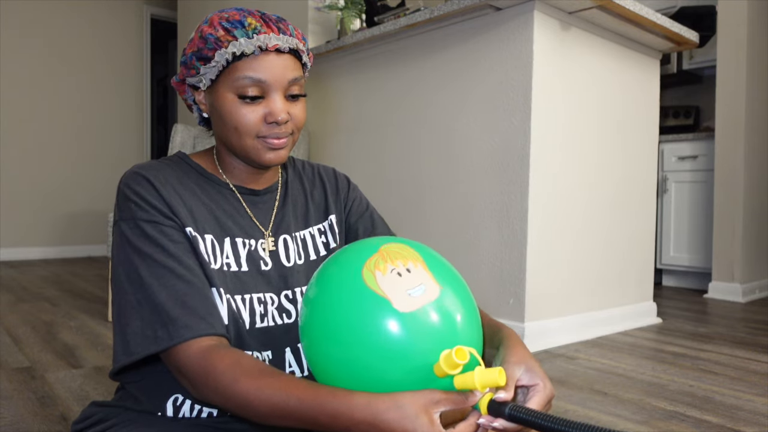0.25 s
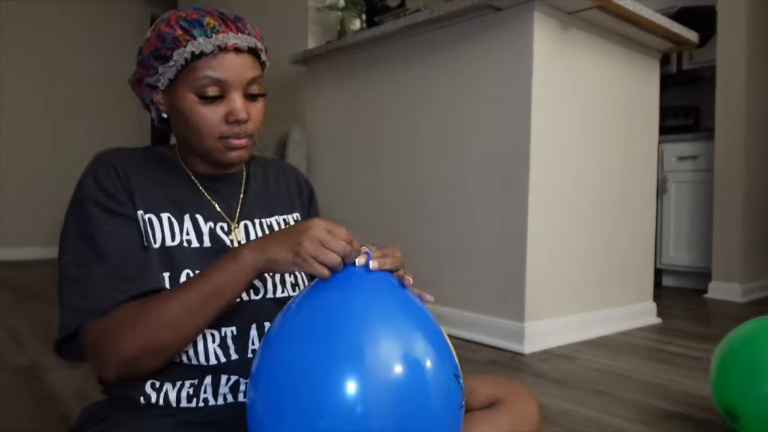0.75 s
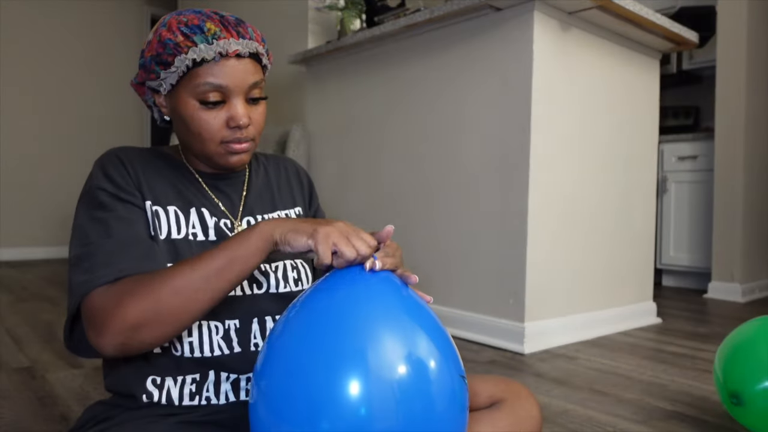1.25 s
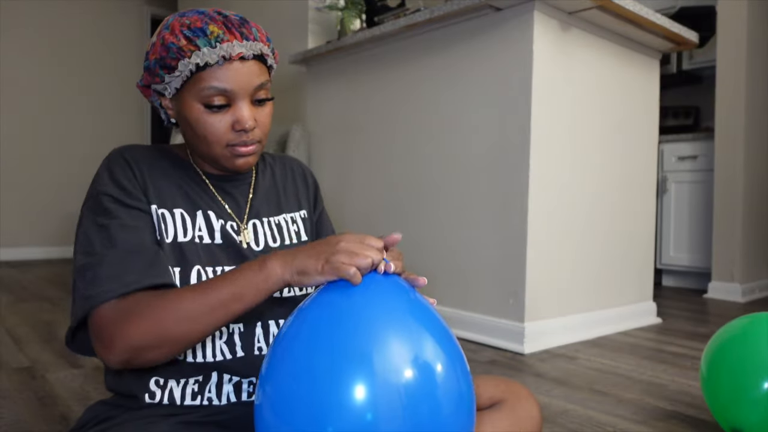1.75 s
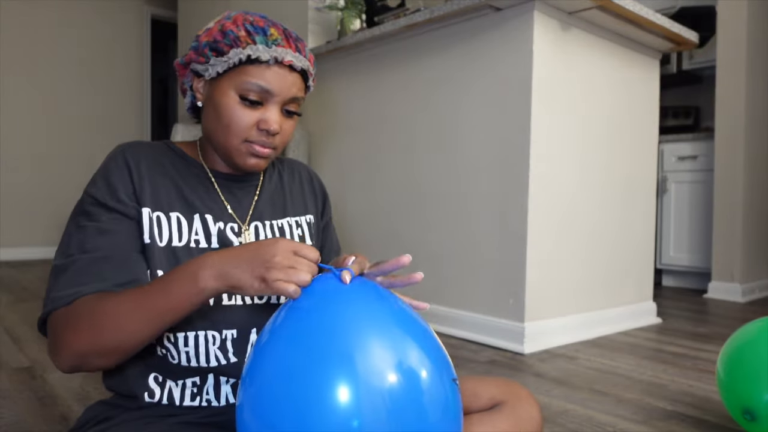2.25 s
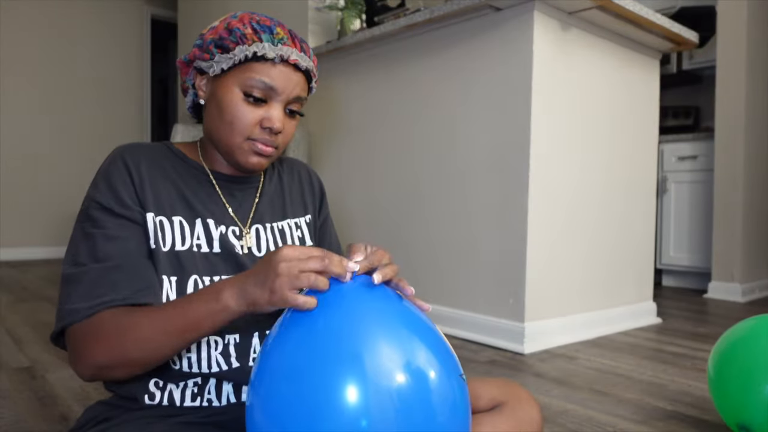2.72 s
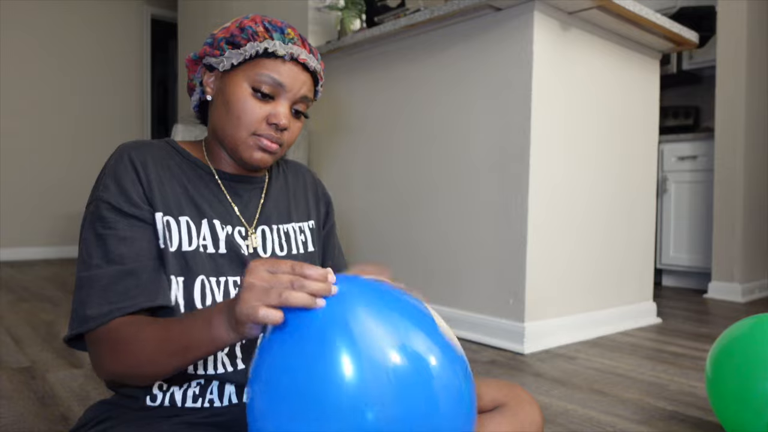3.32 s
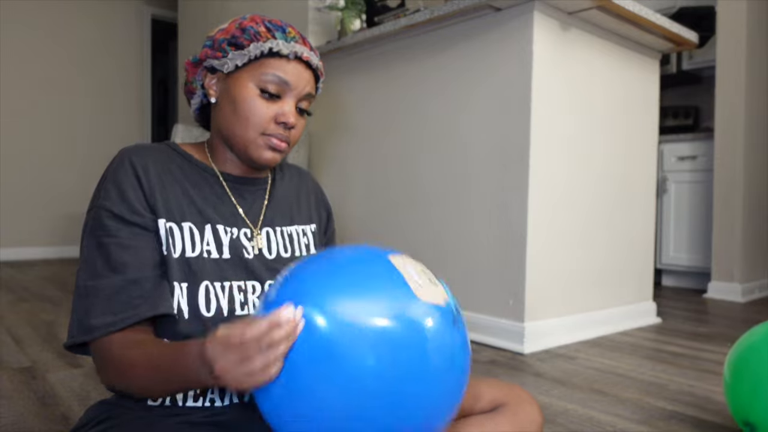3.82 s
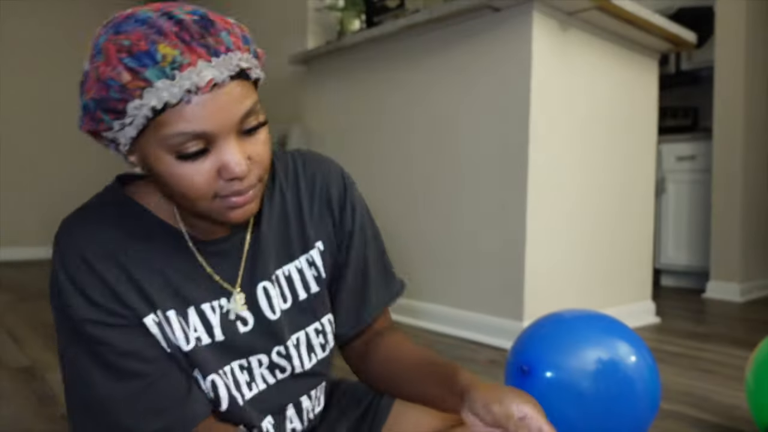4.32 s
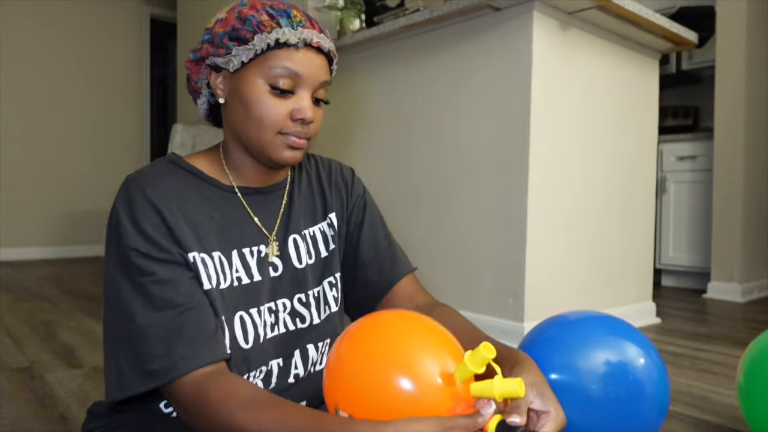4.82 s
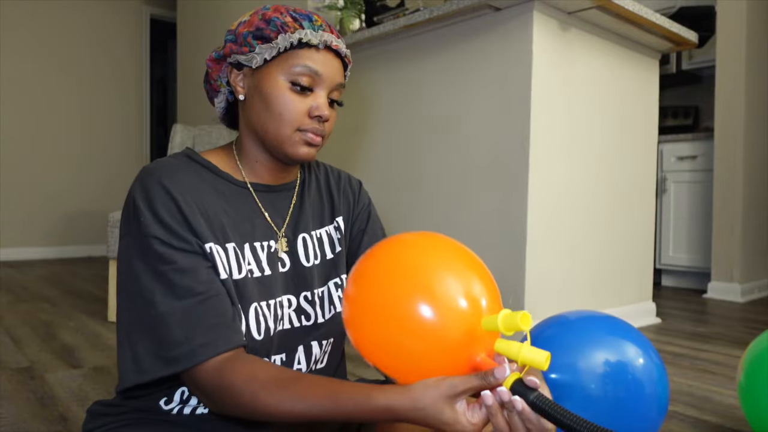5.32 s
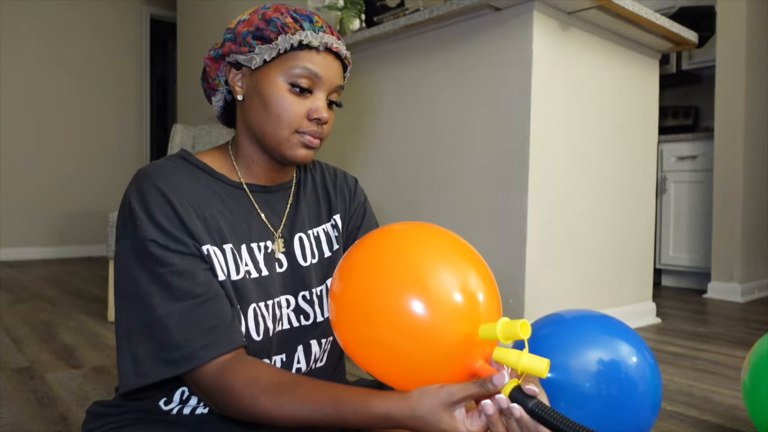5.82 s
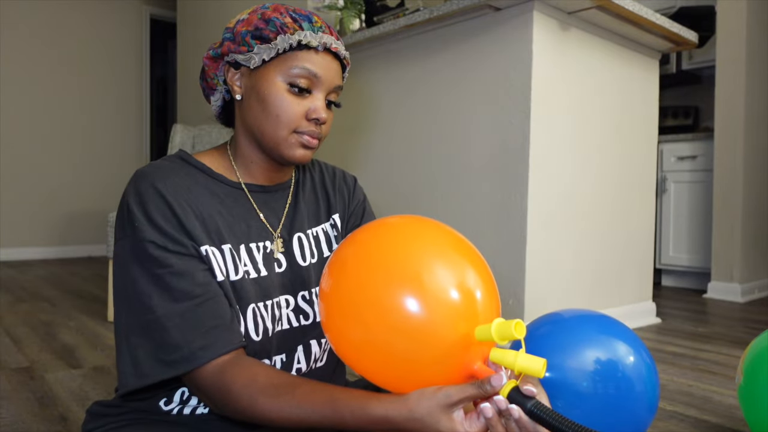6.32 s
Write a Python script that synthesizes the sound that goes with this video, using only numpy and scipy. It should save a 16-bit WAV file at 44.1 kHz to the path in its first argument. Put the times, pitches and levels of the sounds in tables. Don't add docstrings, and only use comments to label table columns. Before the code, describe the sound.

Close air pump blast stops abruptly; in a quiet room a balloon neck is stretched and knotted with small squeaks, then a brighter pump blast resumes.

```python
import sys
import numpy as np
from scipy import signal
from scipy.fft import rfft, irfft, next_fast_len
from scipy.io import wavfile
from scipy.ndimage import uniform_filter1d, minimum_filter1d

SR = 44100
rng = np.random.default_rng(int(sys.argv[2]) if len(sys.argv) > 2 else 0)


def elevation(decibels):
    levels = np.asarray(decibels, float)
    return 10 ** (levels / 20)


def master_out(mix):
    frames = np.transpose(np.atleast_2d(mix))
    ceiling = np.clip(frames, -1, 1)
    pcm = np.round(ceiling * 32767).astype(np.int16)
    wavfile.write(sys.argv[1], SR, pcm)


N = 289296
TIME, SIZE = np.arange(N) / SR, next_fast_len(N, True)
BINS = np.maximum(np.fft.rfftfreq(SIZE, 1 / SR), 1)

# time in seconds, air rush in dB, shaft tone in dB.
SLOW_RUN = [
    (0, -14.5, -21),
    (.2, -14.5, -21.5),
    (.42, -13.5, -21),
]
FAST_RUN = [
    (4.31, -15, -23.5),
    (4.53, -14.5, -26.5),
    (4.88, -15.5, -23.5),
    (6.52, -14.5, -22.5),
    (6.56, -13, -22),
]
# time in seconds, level in dB.
BLADE_TONE = [
    (4.3, -38),
    (4.7, -35),
    (4.85, -31),
    (5.7, -30),
    (6.1, -32),
    (6.25, -34),
    (6.45, -30),
]
# multiple of the shaft rate, level beside the shaft tone in dB.
OVERTONES = [(2, -20), (3, -20.5), (4, -26.5), (6, -20)]
# frequency in Hz, level in dB.
MOTOR_HUM = [(128, -85.5), (243, -84)]
# frequency in Hz, level in dB per Hz.
SLOW_AIR = [(60, -67), (133, -52), (340, -28), (600, -20), (800, -19), (1600, -14.5), (1950, -10),
            (2650, -13), (4200, -15.5), (8000, -16.5), (11500, -18.5), (16000, -23)]
FAST_AIR = [(30, -53.5), (100, -58), (193, -61.5), (715, -27), (1050, -23), (1300, -17.5), (1620, -17),
            (2520, -13), (3850, -6), (7940, -12.5), (8920, -11.5), (10300, -14), (13500, -10),
            (16000, -11.5)]
# frequency in Hz, width in Hz, boost in dB.
SLOW_PIPES = [(1280, 170, 4.5), (1920, 280, 2.5), (2690, 190, 4), (3470, 79, 5.5), (4762, 310, 3.5),
              (6700, 770, 4), (9140, 140, 5), (11300, 200, 2), (11600, 430, -5), (12700, 900, 4.5),
              (13900, 600, -6), (14700, 300, 3.5)]
FAST_PIPES = [(750, 156, 3.3), (2550, 200, 4), (3985, 110, 1.5), (5580, 300, 2.3), (6780, 340, 2.6),
              (9170, 290, 4), (13400, 610, 1.4)]
# frequency in Hz, left minus right in dB.
SLOW_PAN = [(350, 0), (450, -1.6), (900, -1.2), (1300, -3), (3400, -2.3), (3900, -3.1), (8200, -3),
            (8900, 0), (10800, .5), (11700, 3.2), (14500, 3.2), (15500, 2.5)]
FAST_PAN = [(950, 0), (1100, -1.7), (1800, -1.9), (2300, -3), (3200, -4), (6300, -3.4), (8000, -2.4),
            (8750, -2.2), (8950, -4.4), (10500, -3), (13500, -1.9), (15500, -2.5)]
# frequency in Hz, level in dB per Hz.
FLOOR = [(18, -64.5), (30, -51.5), (189, -17.5), (239, -7), (364, -9), (1010, -4), (1670, -5.5), (5170, -8),
         (5740, -5.5), (12000, -15.5), (16000, -17.5)]
# time in seconds, peak in dB, brightness in dB.
TICKS = [(0.6854, -34, -17), (0.7014, -34, -15), (0.7565, -32, -11), (0.7899, -36, -14), (0.8213, -38, -4),
         (0.9226, -37, -12), (1.0254, -27, -12), (1.1522, -33, -13), (1.2523, -39, -13), (1.463, -37, -9.5),
         (1.5123, -41, -9), (2.0021, -45, -5), (2.0595, -45, -5), (2.086, -41, -6), (2.1425, -42, -7),
         (2.1772, -41, -10), (2.276, -47, -16), (2.5045, -38, -17), (2.716, -44, -14), (2.9, -38, -14),
         (3.1855, -38, -14), (3.2603, -31, -15), (3.4299, -45, -17), (3.4603, -36, -16), (3.6289, -38, -15),
         (3.6894, -33, -6), (3.717, -26, -13), (3.7404, -32, -7), (3.9163, -38.5, -8), (4.2396, -49, -9)]
# time in seconds, peak in
# dB.
MORE_TICKS = [(0.4888, -51), (0.692, -36), (0.7074, -32), (0.799, -35), (0.8134, -38), (1.045, -35),
              (1.4324, -54), (1.646, -38), (1.825, -36), (1.9577, -44), (2.0196, -52), (2.0994, -47),
              (2.113, -52), (2.2062, -52), (2.2226, -47), (2.3429, -51), (2.4401, -47), (2.5174, -46),
              (2.5349, -41), (2.722, -39), (3.0138, -42), (3.036, -41), (3.3965, -50)]
# frequency in Hz, width in Hz, level in dB.
BODY = [(760, 93, -5), (925, 150, -3), (1200, 260, -5), (1560, 400, -2.5)]
SKIN = [(2130, 1300, -6.5), (2750, 500, 1.5), (3236, 1300, -1.5), (3825, 690, 1.5), (4600, 330, -1.5)]
TIPS = [(4950, 180, -5), (5750, 680, 3), (6700, 600, 2), (7540, 680, 1.5)]
RUSTLE = [(8600, 490, 1.5), (9400, 800, -1.5), (10800, 1500, -3.5), (13000, 3000, -10)]
# start in seconds, length in seconds, first frequency in Hz, last frequency in Hz, level in dB.
SQUEAKS = [(.51, 0.11, 3590, 3600, -75), (0.801, 0.034, 1030, 1000, -69), (0.928, 0.1, 1060, 1100, -68),
           (0.918, 0.26, 3530, 3620, -58.5), (0.858, 0.14, 2960, 2720, -67), (1.031, .05, 980, 990, -61),
           (1.249, 0.069, 1000, 930, -60.5), (1.396, 0.3, 3700, 3400, -73), (1.5, 0.33, 2590, 2330, -70),
           (1.85, 0.15, 6300, 6600, -67), (2.275, .03, 1300, 1280, -71), (2.318, 0.1, 5930, 5900, -87),
           (2.275, 0.031, 2550, 2550, -63), (2.49, 0.065, 2500, 2500, -69), (2.698, 0.062, 2550, 2580, -67),
           (2.842, 0.12, 710, 760, -73.5), (3.014, 0.12, 2560, 2550, -61), (3.11, 0.087, 943, 700, -73),
           (3.18, 0.1, 1000, 1250, -73), (3.255, .06, 970, 960, -62), (3.254, 0.018, 3630, 3700, -51),
           (3.51, 0.11, 1700, 1700, -69), (3.596, 0.24, 4780, 4800, -65)]
# start in seconds, hold in seconds, level in dB, brightness in dB.
RUBS = [(.53, 0.044, -72, 8), (.585, 0.017, -48.5, -7), (.82, .01, -60.5, -4), (.924, .075, -56.5, 3),
        (1.04, 0.022, -53.5, 3), (1.25, 0.02, -59.5, -1), (1.335, .025, -70, 0), (2.279, 0.015, -64.5, -2),
        (2.33, 0.047, -69, 5), (2.498, .025, -67, -7), (2.712, 0.03, -62.5, -1), (2.885, 0.017, -64, 3),
        (3.262, 0.013, -54, 0), (3.345, .01, -74, 10), (3.398, .01, -70, 5), (3.432, 0.062, -61.5, -1),
        (3.615, 0.13, -54.5, 1)]
DRAGS = [(.62, 0.018, -61, -4), (.85, 0.039, -61.5, 1), (1.1, 0.066, -60.5, 0.5), (1.2, .04, -71, -2),
         (1.56, 0.091, -60.5, -1), (1.75, 0.047, -63.5, -2), (1.87, 0.096, -74.5, 6.5), (2.0, 0.15, -83, 6),
         (2.85, .02, -66.5, 1.5), (3.04, .04, -63.5, 0.5), (2.97, .03, -78, 10), (3.125, .015, -61.5, 5),
         (2.44, .05, -75, 2), (2.17, .03, -75, 0.5), (3.18, 0.077, -59.5, -2.5), (3.55, .015, -60, 2),
         (3.8, .07, -74.5, 15.5), (3.93, 0.012, -65, 10.5), (4.15, 0.035, -75, 12.5),
         (4.25, .04, -64.5, 2.5)]
# level beside the skin in dB, share of the brightness as a ratio.
SHARES = [(-10, -.6), (-0.5, 0), (-1, .8), (-6, 1.3)]
# frequency in Hz, level in dB.
SNAP = [(1100, -18), (3600, 0), (5200, -9), (6300, -8), (9200, -11)]
# frequency in Hz, level in dB per Hz.
SNAP_ROOM = [(180, -78), (300, -48), (762, -17), (1390, -5), (1510, -11), (2360, 0.5), (4830, 2),
             (9550, -10), (16000, -39)]

SLOW_SHAFT_HZ, FAST_SHAFT_HZ, BLADES = 620.0, 1253.7, 7
STOP_S, START_S, FADE_S = .433, 4.2905, .011
FLOOR_DB, HUM_HZ, HUM_DB = -76.5, 239.9, -97
MORE_TICKS_BRIGHT_DB = -11
RUB_RISE_DB_PER_S, RUB_FALL_DB_PER_S = 1800, 330
DRAG_RISE_DB_PER_S, DRAG_FALL_DB_PER_S = 150, 130
SNAP_S, SNAP_LENGTH_S, SNAP_DB = .5797, .004, -24
SNAP_ROOM_DB, ROOM_T60_S = -42, 0.43
PEAK_LIMIT, CUTOFF_HZ, CUT_WIDTH_HZ = .74, 15750, 120


def rms_one(x):
    return x / np.sqrt(np.mean(x ** 2) + 1e-20)


def in_time(rows):
    s, *columns = np.transpose(rows)
    return [np.interp(TIME, s, c) for c in columns]


def shape(points):
    hz, value = np.transpose(points)
    return np.interp(np.log(BINS), np.log(hz), value)


def drift(rate):
    steps = rng.standard_normal(int(N / SR * 200) + 2)
    return rms_one(np.interp(TIME * np.clip(rate, .1, 199), np.arange(len(steps)), steps))


def filtered(x, response):
    return irfft(rfft(x, SIZE) * response, SIZE)[..., :N]


def coloured(response):
    return rms_one(filtered(rng.standard_normal(N), response))


def panned(x, pan, unlike_db):
    half = elevation(shape(pan) / 2)
    unlike = elevation(unlike_db) * np.roll(x, N // 50)
    return filtered(x, np.array([half, 1 / half])) + unlike * [[1], [-1]]


def reflections(t60, wet_db):
    echoes = rng.standard_normal(N) * elevation(-60 * TIME / t60) * (TIME > .006)
    return 1 + elevation(wet_db) * rfft(echoes / np.sqrt(np.sum(echoes ** 2)), SIZE)


def air_rush(spectrum, pipes, flutter_db, t60):
    level_db = shape(spectrum)
    for hz, width, boost_db in pipes:
        level_db = level_db + boost_db / (1 + (2 * (BINS - hz) / width) ** 2)
    rush = coloured(elevation(level_db) * reflections(t60, wet_db=-13))
    return rush * elevation(flutter_db * drift(25))


def whine(shaft_hz, tone_db, blade_db):
    turns = 2 * np.pi * np.cumsum(shaft_hz + .3 * drift(20)) / SR
    shaft = np.sin(turns) + sum(elevation(db) * np.sin(k * turns) for k, db in OVERTONES)
    blades = elevation(blade_db + 1.6 * drift(30)) * np.sin(BLADES * turns)
    return np.sqrt(2) * (elevation(tone_db + 0.12 * drift(6.2)) * shaft + blades)


def slow_pump():
    air_db, tone_db = in_time(SLOW_RUN)
    pump = elevation(air_db) * air_rush(SLOW_AIR, SLOW_PIPES, flutter_db=0.6, t60=.25)
    pump += whine(SLOW_SHAFT_HZ, tone_db, blade_db=-49)
    fade = np.clip((STOP_S - TIME) / FADE_S, 0, 1)
    remnant = elevation(-23) * np.clip((STOP_S + FADE_S - TIME) / FADE_S, 0, 1)
    return panned(pump, SLOW_PAN, unlike_db=-26.5) * np.maximum(fade, remnant)


def room_floor():
    hum = np.sqrt(2) * elevation(HUM_DB) * np.sin(2 * np.pi * HUM_HZ * TIME)
    return elevation(FLOOR_DB) * coloured(elevation(shape(FLOOR))) + hum


def resonate(x, modes):
    out = np.zeros(N)
    for k, (hz, width, level_db) in enumerate(modes):
        r = np.exp(-np.pi * width / SR)
        b = (1 - r * r) / 2 * np.array([1, 0, -1])
        a = [1, -2 * r * np.cos(2 * np.pi * hz / SR), r * r]
        out += (-1) ** k * elevation(level_db) * signal.lfilter(b, a, x + 1e-18)
    return out


def ticks(length_s):
    slips = TICKS + [(s, db, MORE_TICKS_BRIGHT_DB) for s, db in MORE_TICKS]
    s, peak_db, bright_db = np.transpose(slips)
    burst = rng.standard_normal((len(s), 200)) * np.exp(-np.arange(200) / SR / length_s)
    burst /= np.sqrt(np.sum(burst ** 2, axis=1, keepdims=True))
    low, high = np.zeros(N), np.zeros(N)
    for at, db, bright, b in zip((s * SR).astype(int), peak_db, bright_db, burst):
        low[at:at + 200] = elevation(db) * b
        high[at:at + 200] = elevation(db + bright) * b
    bright = elevation(20) * (resonate(high, TIPS) + elevation(-5) * resonate(high, RUSTLE))
    return elevation(12) * resonate(low, SKIN) + elevation(9.5) * resonate(low, BODY) + bright


def friction(slips_per_s, smooth):
    sizes = elevation(2.8 * np.minimum(rng.exponential(1, N), 4)) * rng.choice([-1, 1], N)
    slips = sizes * (rng.random(N) < slips_per_s * elevation(5.0 * drift(90)) / SR)
    return rms_one(rms_one(slips) + smooth * rng.standard_normal(N))


def squeaks(source, breadth):
    out = np.zeros(N)
    for s, length, first_hz, last_hz, db in SQUEAKS:
        at, size = int(s * SR), int(length * SR)
        turn = np.exp(2j * np.pi * np.cumsum(np.linspace(first_hz, last_hz, size)) / SR)
        r = np.exp(-np.pi * breadth * first_hz / SR)
        centred = signal.lfilter([1], [1, -2 * r, r * r], source[at:at + size] / turn)
        band = np.real(centred * turn)
        swell = np.sin(np.pi * np.sqrt(np.arange(size) / size))
        out[at:at + size] += elevation(db) * swell * rms_one(band)
    return out


def strokes(rows, rise, fall, offset_db, share):
    s, hold, db, bright = np.transpose(rows)[..., None]
    t = TIME[::44]
    level_db = db + offset_db + share * bright
    level_db = level_db - rise * np.maximum(s - t, 0) - fall * np.maximum(t - s - hold, 0)
    return np.interp(TIME, t, np.sum(elevation(2 * level_db), axis=0))


def rubbing(source, patchy_db):
    out = np.zeros(N)
    for (offset_db, share), modes in zip(SHARES, (BODY, SKIN, TIPS, RUSTLE)):
        power = strokes(RUBS, RUB_RISE_DB_PER_S, RUB_FALL_DB_PER_S, offset_db, share)
        power = power + strokes(DRAGS, DRAG_RISE_DB_PER_S, DRAG_FALL_DB_PER_S, offset_db, share)
        group = np.zeros(N)
        for k, mode in enumerate(modes):
            group += (-1) ** k * elevation(patchy_db * drift(9)) * resonate(source, [mode])
        out += np.sqrt(power) * elevation(1.0 * drift(35)) * rms_one(group)
    return out


def snap():
    since = TIME - SNAP_S
    ring = sum(elevation(db) * np.sin(2 * np.pi * hz * since) for hz, db in SNAP)
    ring = ring * (since > 0) * np.clip((SNAP_LENGTH_S - since) / .001, 0, 1)
    ring = ring * np.exp(-np.abs(since) / 0.003)
    tail = coloured(elevation(shape(SNAP_ROOM)))
    tail = tail * (since > 0) * elevation(SNAP_ROOM_DB - 60 * np.abs(since) / ROOM_T60_S)
    thin = signal.butter(4, 750, "high", fs=SR, output="sos")
    return signal.sosfilt(thin, elevation(SNAP_DB) * ring + tail)


def fast_pump():
    air_db, tone_db = in_time(FAST_RUN)
    blade_db, = in_time(BLADE_TONE)
    pump = elevation(air_db) * air_rush(FAST_AIR, FAST_PIPES, flutter_db=0.0, t60=.14)
    pump += whine(FAST_SHAFT_HZ, tone_db, blade_db)
    for hz, db in MOTOR_HUM:
        pump += np.sqrt(2) * elevation(db + 2.1 * drift(8)) * np.sin(2 * np.pi * hz * TIME)
    return panned(pump, FAST_PAN, unlike_db=-51) * np.clip((TIME - START_S) / FADE_S, 0, 1)


def scene():
    after_stop = np.clip((TIME - STOP_S) / FADE_S, 0, 1)
    before_start = np.clip((START_S + FADE_S - TIME) / FADE_S, 0, 1)
    grip = friction(slips_per_s=870, smooth=0.96)
    hands = rubbing(grip, patchy_db=1.2) * after_stop * before_start
    hands += squeaks(grip, breadth=0.17) + ticks(length_s=0.00042) + snap()
    centre = [(300, 0), (800, -.8), (2400, -.5), (5000, -.2)]   # (Hz, left minus right dB)
    return slow_pump() + fast_pump() + panned(hands + room_floor(), centre, unlike_db=-31.0)


def band_limit(x):
    return signal.sosfilt(signal.butter(12, 16890, fs=SR, output="sos"), x)


def record(dry):
    needed = np.minimum(1, PEAK_LIMIT / (np.max(np.abs(dry), axis=0) + 1e-9))
    held = minimum_filter1d(needed, size=441)
    gain = uniform_filter1d(uniform_filter1d(held, size=220), size=220)
    edge = np.clip((CUTOFF_HZ - BINS) / CUT_WIDTH_HZ + .5, 0, 1)
    mix = filtered(dry * gain, np.sin(np.pi / 2 * edge) ** 2)
    return band_limit(mix)


dry = scene()
out = record(dry)
master_out(out)
```